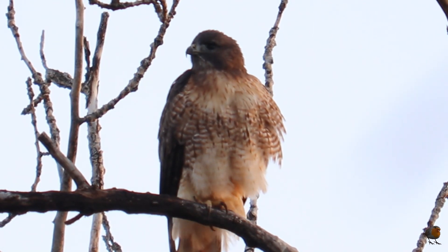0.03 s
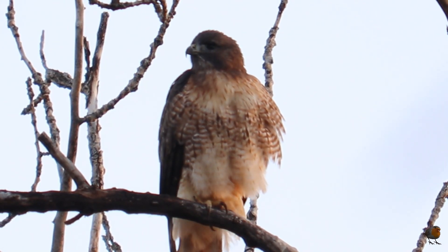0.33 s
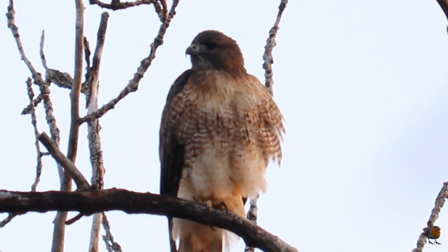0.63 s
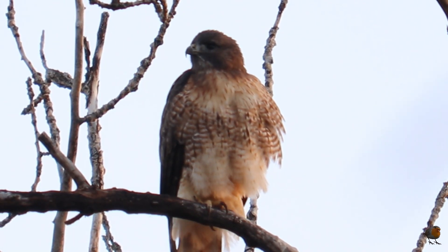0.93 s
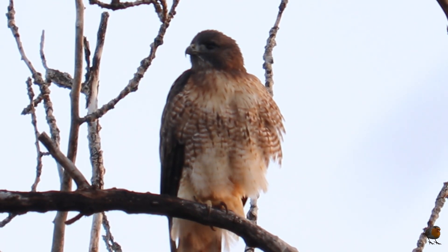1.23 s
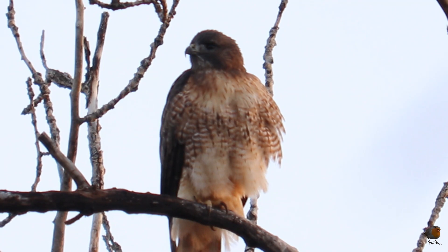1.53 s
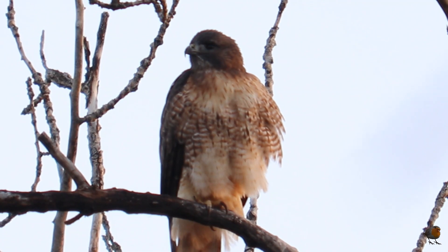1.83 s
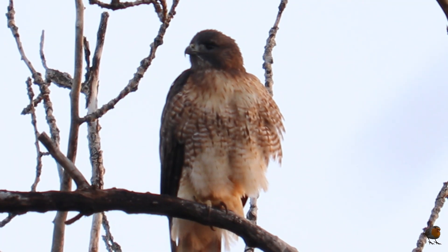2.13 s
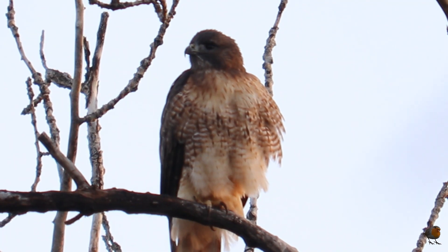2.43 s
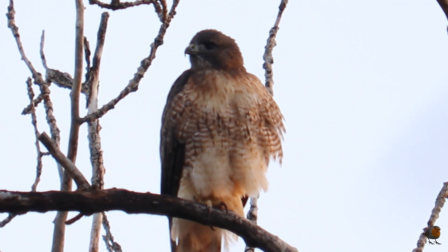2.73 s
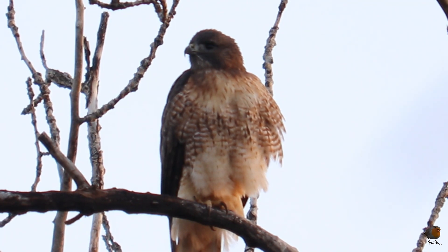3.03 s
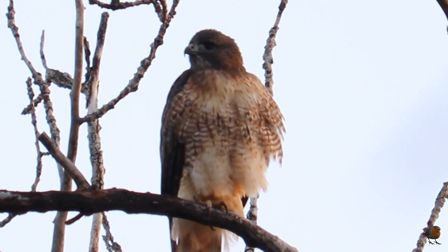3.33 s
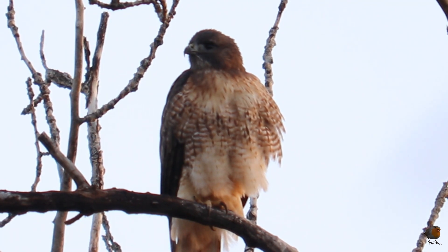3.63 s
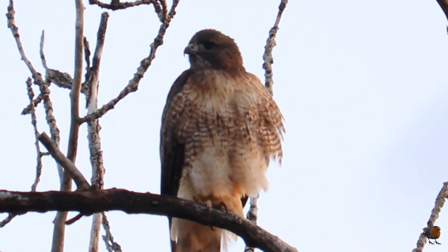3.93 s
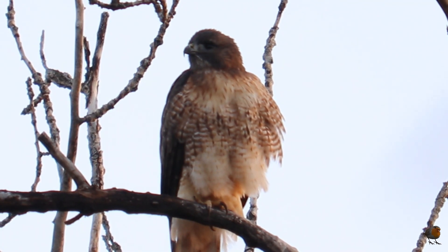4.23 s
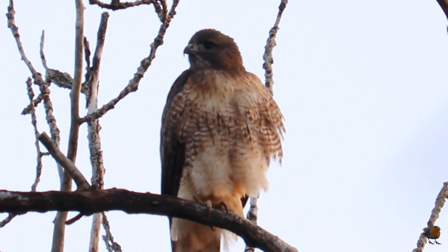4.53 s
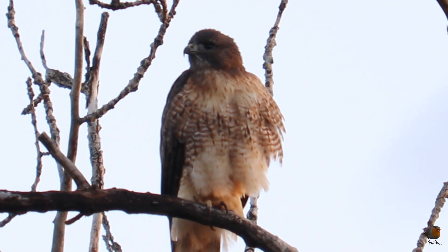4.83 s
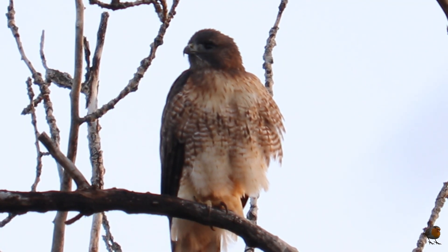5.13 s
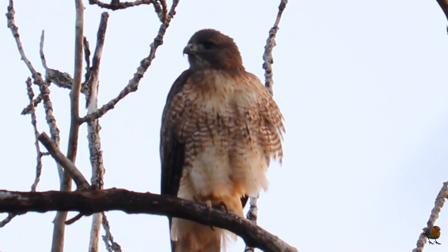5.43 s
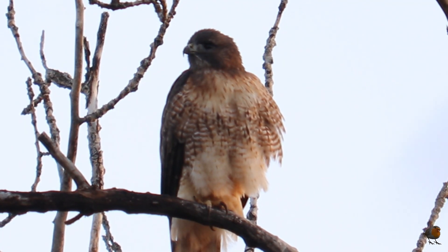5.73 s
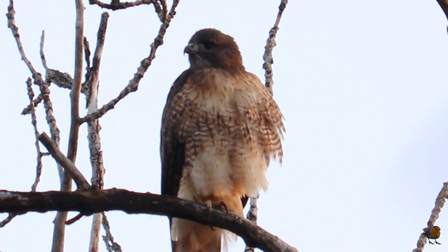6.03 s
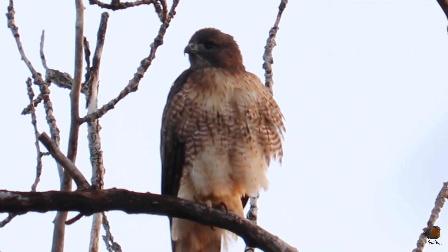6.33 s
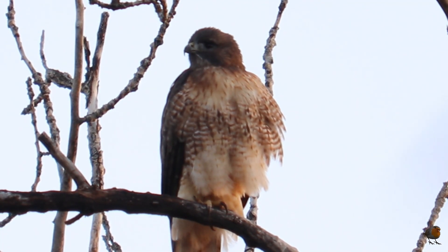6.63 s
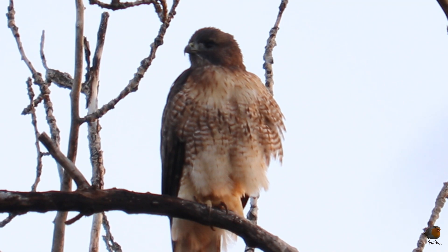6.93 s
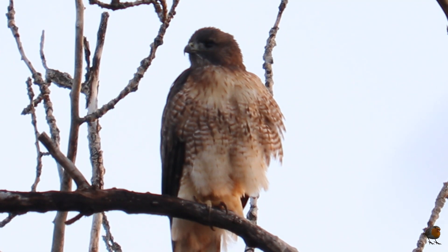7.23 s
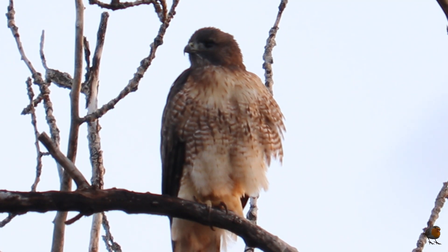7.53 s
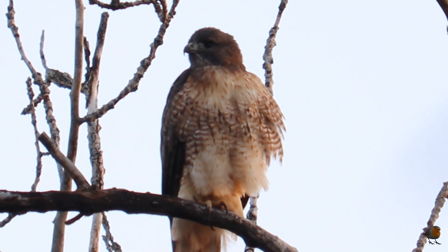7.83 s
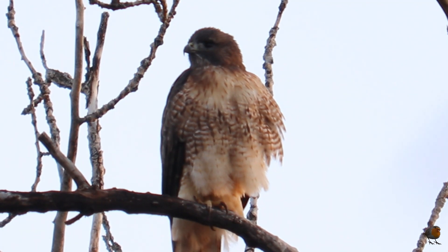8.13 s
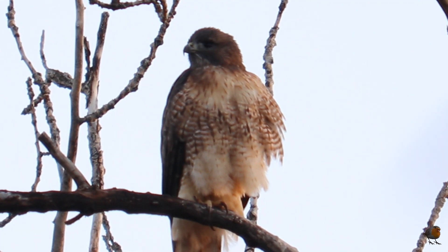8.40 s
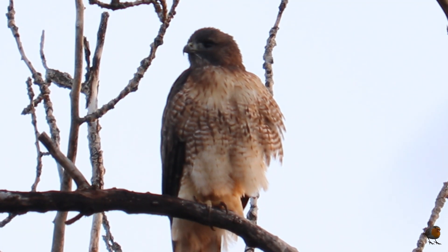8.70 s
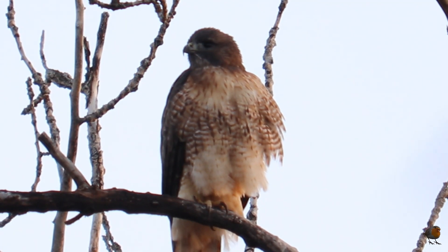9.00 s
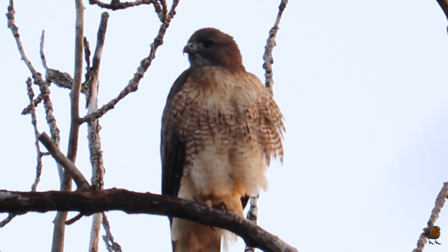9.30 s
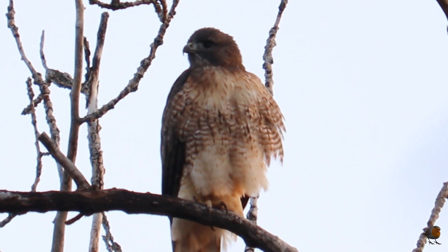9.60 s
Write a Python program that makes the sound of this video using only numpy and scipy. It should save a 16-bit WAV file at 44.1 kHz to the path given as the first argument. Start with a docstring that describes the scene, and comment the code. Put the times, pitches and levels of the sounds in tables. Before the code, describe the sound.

A small bird gives sharp, high, falling chips about once a second from bare trees, each with a brief echo. A second bird adds a few faint, lower peeps, and twigs tick now and then. Underneath, far traffic rushes while a distant, burbling engine slows, idles, pulls away twice and runs down. The microphone hisses softly.

```python
"""A small bird gives sharp, falling chip calls from bare trees; branches and nearby walls scatter each one.
A second bird answers with a few faint, lower peeps, and some twigs tick.
Far traffic rushes, and a distant eight-cylinder engine burbles through its exhaust pipe as it slows,
idles, pulls away twice and runs down. The microphone hisses softly."""
import sys
import numpy as np
from scipy import signal
from scipy.fft import rfft, irfft, next_fast_len
from scipy.io import wavfile
from scipy.ndimage import map_coordinates

SR = 44100
rng = np.random.default_rng(int(sys.argv[2]) if len(sys.argv) > 2 else 0)


def wrap_up_sound(samples):
    """Save the sound to the file named by the first command line argument, as 16-bit audio."""
    columns = np.atleast_2d(samples).T
    # keep every value between -1 and 1, then stretch to whole-number steps
    tamed = np.clip(columns, -1, 1)
    steps = np.round(tamed * 32767).astype(np.int16)
    wavfile.write(sys.argv[1], SR, steps)


N = 430416


def amp(db):
    """Turns decibels (dB) into a number to multiply a sound by."""
    return 10 ** (np.asarray(db) / 20)


def unit(x):
    """Scales a sound so that its average level (rms) is 1."""
    return x / np.sqrt(np.mean(x ** 2) + 1e-20)


def curves(rows):
    """Joins timed points with straight lines: one curve for each column after the time."""
    times, *columns = np.transpose(rows)
    return [np.interp(np.arange(N) / SR, times, column) for column in columns]


def wobble(rate):
    """A smooth curve through random points, `rate` of them each second."""
    points = rng.standard_normal(int(N * rate / SR) + 4)
    return map_coordinates(points, [np.arange(N) * rate / SR])


def filtered(x, response):
    """Turns each frequency of a sound up or down by the gain response(hz)."""
    size = next_fast_len(N + SR // 2)
    return irfft(rfft(x, size) * response(np.fft.rfftfreq(size, 1 / SR)), size)[..., :N]


def noise(spectrum):
    """Noise whose tone colour follows rows of frequency in Hz and relative level in dB."""
    points_hz, db = np.transpose(spectrum)
    colour = lambda hz: amp(np.interp(np.log(hz + 1), np.log(points_hz), db))
    return unit(filtered(rng.standard_normal(N), colour))


def add(track, start_s, sound):
    """Mixes a sound into the track at the given time."""
    part = track[max(round(start_s * SR), 0):][:len(sound)]
    part += sound[:len(part)]


def microphone(shared_db=-68.5, own_db=-69.0, whine_hz=9351, whine_db=-91):
    """Electronic hiss, partly shared by left and right, and a very thin whine."""
    # Colour of the hiss. Each row: frequency in Hz, relative level in dB.
    hiss = [(1000, -5), (3500, 1.5), (7000, .5), (11000, -0.5), (16000, -1)]
    whine = amp(whine_db) * np.sin(2 * np.pi * whine_hz * np.arange(N) / SR)
    return amp(shared_db) * noise(hiss) + amp(own_db) * np.array([noise(hiss), noise(hiss)]) + whine


def traffic(tyre_db=-51, rumble_db=-46.5, swell_half_s=0.53):
    """Tyre rush and rumble of far roads, with one car's wavering drone."""
    # Colours of the rush and the rumble. Each row: frequency in Hz, relative level in dB.
    tyre_colour = [(150, -13), (250, -4), (400, -3.5), (550, -3), (750, -4), (1000, -4.5), (1300, -9),
                   (1600, -13.5), (2000, -19), (2600, -26), (3300, -31), (4500, -32.5), (6000, -44),
                   (9000, -55)]
    rumble_colour = [(12, -44), (20, -24), (32, -23), (35, -28), (45, -10), (65, -0.5), (83, -5.5),
                     (103, -4), (140, -4), (177, -11), (203, -7), (400, -21.5), (520, -37), (880, -120)]
    # Passing vehicles swell the rush. Each row: time when nearest in seconds, boost in dB.
    passes = [(.1, 1.45), (2.2, 1.37)]
    # The droning car. Each row: time in seconds, pitch in Hz, level in dB.
    car = [(2.6, 77, -68), (3, 80, -48), (4.1, 86.1, -53), (5, 100, -40.5), (5.5, 95.5, -50),
           (6.8, 87.8, -74)]
    t = np.arange(N) / SR
    car_hz, car_db = curves(car)
    drone = amp(car_db + 2.6 * wobble(7)) * np.sin(2 * np.pi * np.cumsum(car_hz) / SR)
    swell_db = sum(db / (1 + ((t - nearest_s) / swell_half_s) ** 2) for nearest_s, db in passes)
    rush = amp(tyre_db + swell_db + 0.55 * wobble(7.4)) * noise(tyre_colour)
    rumble = amp(rumble_db + 0.5 * wobble(2.87)) * noise(rumble_colour)
    return rush + rumble + drone


def exhaust_pipe(hz):
    """The pipe's gain at a frequency: it rings where an odd number of quarter waves fits inside."""
    # The pipe's resonances. Each row: centre in Hz, width in Hz, gain in dB.
    rings = [(103, 22, -1), (169.3, 29.8, 2), (234, 15, -6.5), (314, 22, -4), (370.1, 27, -10),
             (450, 43, -4), (553, 110, -8.5)]
    return np.sqrt(sum(amp(2 * db) / (1 + (2 * (hz - centre) / width) ** 2) for centre, width, db in rings))


def engine_load(build_s=0.28, release_s=0.35):
    """Boosts in dB for the firing tone and the burble while the engine pulls or brakes the car."""
    # Spells of load. Each row: start and start of release in seconds, tone and burble boosts in dB.
    spells = [(-.25, 1.85, 9.5, 1.5), (4.15, 5, -1, 11.5), (5.15, 5.7, 2, 13.5), (7.35, 8.51, 2, 11.5),
              (8.72, 9.55, 7, 11)]
    t, boosts = np.arange(N) / SR, []
    for start, end, tone_db, burble_db in spells:
        effort = np.clip(np.minimum((t - start) / build_s, 1 - (t - end) / release_s), 0, 1)
        boosts.append([effort * tone_db, effort * burble_db])
    return np.max(boosts, axis=0)


def engine(cruise_hz=69.3, cruise_tone_db=-50.5, cruise_burble_db=-55.5, gas_db=-11, low_hz=46):
    """Firing cylinders make a tone; uneven firing adds a burble that the exhaust pipe colours."""
    # Engine speed. Each row: time in seconds, firings per second.
    speed = [(0, 73.5), (.6, 69.1), (1.45, 56.14), (2.2, 40.02), (4.1, 38.93), (4.4, 47), (5.2, 53.25),
             (5.4, 60.1), (5.85, 67.93), (7.1, 69.18), (7.8, 79.87), (8.2, 94.37), (8.62, 104.9),
             (8.85, 102.1), (9.35, 81.76), (9.76, 66.1)]
    # The burble's tones. Each row: multiple of the crankshaft's speed, relative level in dB.
    burble_tones = [(3, -8), (5, -1.5), (6, -13), (7, 2), (8, -1.5), (9, -4), (11, -3.5), (12, 1), (13, -6),
                    (14, -12), (15, -7.5), (16, -10), (17, -7.5)]
    firing_hz, = curves(speed)
    octaves = np.log2(firing_hz / cruise_hz)  # a faster engine is louder
    tone_load_db, burble_load_db = engine_load()
    tone_db = cruise_tone_db + 7 * octaves + tone_load_db + 2 * wobble(6)
    burble_db = cruise_burble_db + 8.5 * octaves + burble_load_db
    crank_hz = firing_hz / 4  # eight cylinders give four firings per turn
    crank_angle = 2 * np.pi * np.cumsum(crank_hz * (1 + 0.0042 * wobble(14))) / SR
    tone = np.sqrt(2) * np.sin(4 * crank_angle)
    grid_hz = np.arange(1000)
    pipe_gain, burble = exhaust_pipe(grid_hz), np.zeros(N)
    for multiple, db in burble_tones:
        wave = np.sin(round(multiple) * crank_angle + rng.uniform(0, 2 * np.pi))
        flutter_db = 1.63 * wobble(6)  # moving air makes each tone flutter on its own
        resonance = np.interp(round(multiple) * crank_hz, grid_hz, pipe_gain)
        burble += amp(db + flutter_db) * resonance * wave
    gas = unit(filtered(rng.standard_normal(N), lambda hz: exhaust_pipe(hz) / (1 + (hz / 520) ** 6)))
    carry = 1 / np.sqrt(1 + (low_hz / firing_hz) ** 10)  # below low_hz the tone hardly carries
    return amp(tone_db) * carry * tone + amp(burble_db) * (burble + amp(gas_db) * gas)


def twig_ticks(ring_db=-9, crack_db=-7, width_hz=2200):
    """Twigs give tiny dry ticks: a brief ring and a crack of noise around the same pitch."""
    # Each row: start in seconds, level in dB, pitch in Hz, seconds to fade by 60 dB.
    ticks = [(1.048, -47, 5600, .012), (2.933, -55, 3600, .02), (3.251, -51, 2800, .02),
             (6.937, -51, 1720, .04), (8.908, -46.5, 1990, 0.07), (9.122, -51.5, 4100, .03)]
    out, t = np.zeros(N), np.arange(SR // 20) / SR
    grid_hz = np.fft.rfftfreq(len(t), 1 / SR)
    for start_s, db, hz, fade_s in ticks:
        band = 1 / (1 + ((grid_hz - hz) / width_hz) ** 2)
        crack = amp(crack_db) * unit(irfft(rfft(rng.standard_normal(len(t))) * band, len(t)))
        ring = amp(ring_db) * np.sin(2 * np.pi * hz * t)
        add(out, start_s, amp(db - 60 * t / fade_s) * (ring + crack))
    return out


def tree_echoes(call, echo_s, twigs_db, twigs_fade_s, tail_db, tail_fade_s, echo_db=-4, ground_db=-4):
    """A call with a bounce off the nearby ground, one strong echo, scatter from twigs and a longer tail."""
    t = np.arange(SR // 2) / SR

    def scatter(fade_s):
        envelope = amp(-60 * t / fade_s) * (1 - np.exp(-t / 0.003))
        return unit(rng.standard_normal(len(t)) * envelope) / np.sqrt(len(t))

    paths = amp(twigs_db) * scatter(twigs_fade_s) + amp(tail_db) * scatter(tail_fade_s)
    paths[0] += 1  # the sound that comes straight from the bird
    ground_s = 0.0022 * rng.uniform(0.7, 1.3)
    paths[round(ground_s * SR)] += amp(ground_db)
    paths[round(echo_s * SR)] += amp(echo_db)
    heard = signal.fftconvolve(call, paths)
    return heard / np.sqrt(np.sum(heard ** 2) / (SR / 20))  # as much energy as 50 ms at level 1


def bird_peeps(arch=0.152, overtone_db=-14):
    """The second bird's short whistles rise and fall, with a weak overtone an octave up."""
    # Each row: start in seconds, highest pitch in Hz, level in dB, length in seconds.
    peeps = [(0.378, 3730, -75, .012), (0.39, 4250, -73, .022), (0.918, 3300, -69, 0.021),
             (5.912, 3330, -63.5, 0.022), (8.034, 3406, -66.5, 0.024)]
    out = np.zeros(N)
    for start_s, top_hz, db, length_s in peeps:
        hump = np.sin(np.linspace(0, np.pi, int(length_s * SR)))
        pitch_hz = top_hz * (1 + arch * (hump - 1))
        phase = 2 * np.pi * np.cumsum(pitch_hz) / SR
        call = hump * (np.sin(phase) + amp(overtone_db) * np.sin(2 * phase))
        heard = tree_echoes(call, echo_s=0.0034, twigs_db=0.5, twigs_fade_s=0.13,
                            tail_db=-15, tail_fade_s=0.49)
        add(out, start_s, amp(db) * heard)
    return out


def bird_chips(length_s=0.014, fall_s=0.0051, high_note_db=-3):
    """Each chip is a pure tone that starts high, dives, and levels out as it gets loudest."""
    # Each row: start in seconds, first and last pitch in Hz, level in dB, echo delay in seconds.
    chips = [(.081, 6170, 4720, -63.5, .008), (1.805, 6420, 4830, -58, .016),
             (2.594, 6320, 4830, -59.5, .011), (3.886, 6170, 4847, -59, .015),
             (5.073, 6150, 4860, -58, 0.01), (6.064, 6286, 4900, -57.5, .012),
             (7.306, 6250, 4703, -57.5, 0.012), (7.941, 5732, 4920, -63, .005),
             (8.792, 6233, 4865, -55.5, .004), (9.482, 6207, 4770, -62, .014)]
    out, t = np.zeros(N), np.arange(int(length_s * SR)) / SR
    height = np.exp(-(t / fall_s) ** 3)  # 1 at the first pitch, 0 at the last
    envelope = np.sin(np.pi * t / length_s) * amp(high_note_db * height)
    for start_s, first_hz, last_hz, db, echo_s in chips:
        pitch_hz = last_hz + (first_hz - last_hz) * height
        call = envelope * np.sin(2 * np.pi * np.cumsum(pitch_hz) / SR)
        heard = tree_echoes(call, echo_s, twigs_db=5.5, twigs_fade_s=0.22, tail_db=1.5, tail_fade_s=0.51)
        add(out, start_s, amp(db) * heard)
    return out


def scene():
    """Everything outdoors is far off and reaches left and right alike."""
    return bird_chips() + bird_peeps() + twig_ticks() + engine() + traffic() + microphone()


def record(dry, top_hz=15780):
    """Cuts away the very highest treble."""
    return filtered(dry, lambda hz: hz < top_hz)


dry = scene()
out = record(dry)
wrap_up_sound(out)
```